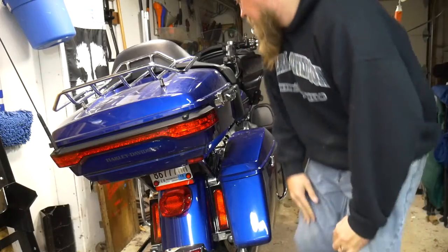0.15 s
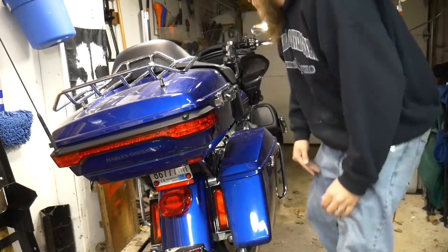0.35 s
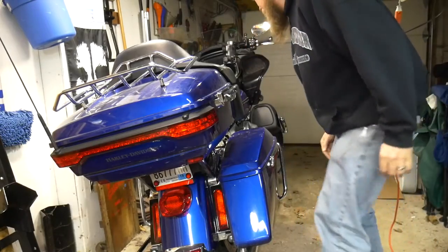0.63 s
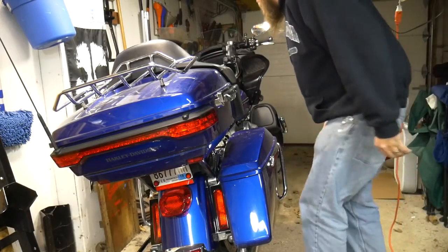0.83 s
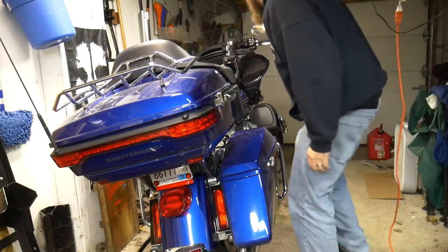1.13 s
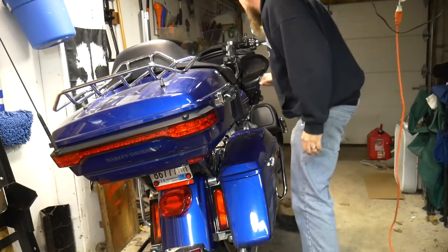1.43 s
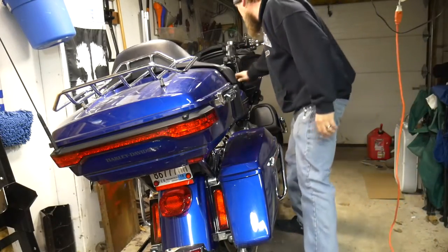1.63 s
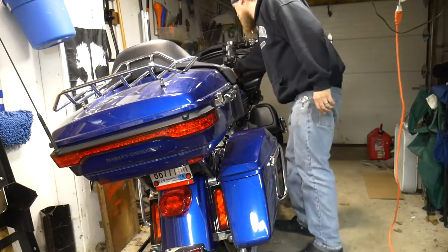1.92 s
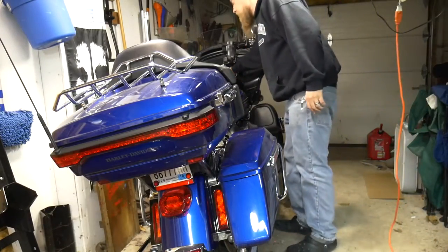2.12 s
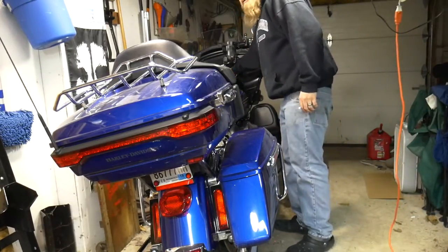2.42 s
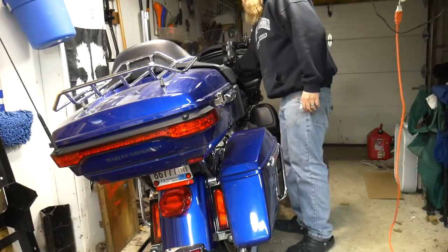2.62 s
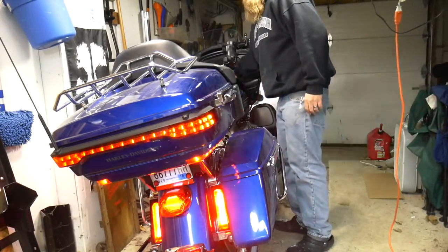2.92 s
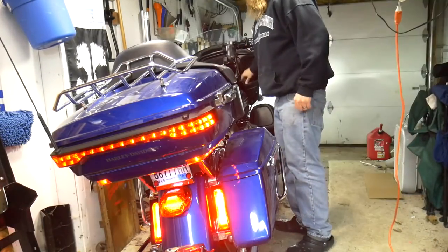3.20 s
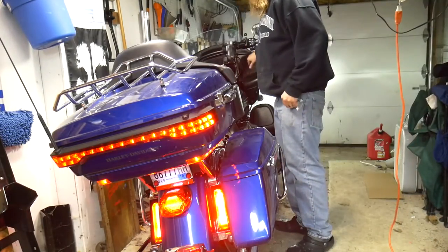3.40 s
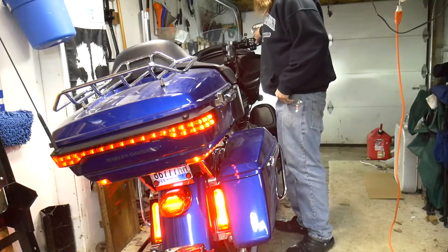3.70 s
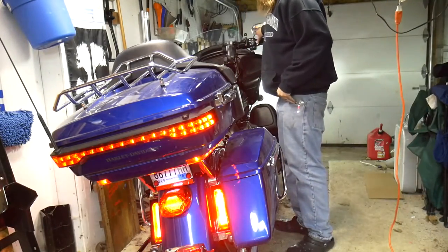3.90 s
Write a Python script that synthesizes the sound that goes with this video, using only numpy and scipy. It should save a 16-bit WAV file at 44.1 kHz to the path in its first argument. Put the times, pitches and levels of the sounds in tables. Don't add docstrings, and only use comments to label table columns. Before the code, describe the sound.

Quiet shuffling over a low hum, a sharp ignition knob snap that rings briefly, a relay clack, then a motorcycle fuel pump whining.

```python
import sys
import numpy as np
from scipy import signal
from scipy.fft import rfft, irfft, next_fast_len
from scipy.io import wavfile
from scipy.ndimage import uniform_filter1d

SR = 44100
rng = np.random.default_rng(int(sys.argv[2]) if len(sys.argv) > 2 else 0)


def digitize_waveform(pressure):
    field = np.atleast_2d(pressure).T
    bounded = np.clip(field, -1, 1)
    quanta = np.round(bounded * 32767).astype(np.int16)
    wavfile.write(sys.argv[1], SR, quanta)


def nominal_scale(level):
    x = np.asarray(level, float) / 20
    return 10 ** x


N = 178635
T = np.arange(N) / SR

# t/s, peak level/dB, rise/ms, time for the rattle to die by 60 dB/ms
KNOB_SNAP = (2.6086, -2, 3.6, 52)


def knob():
    # f/Hz, level/dB
    spectrum = [(150, -60), (250, -39), (400, -13), (800, -18), (1050, -2.5), (1500, -8), (1900, -5.5),
                (2700, -12), (3500, -9), (4600, -14), (5300, -15), (6500, -20.5), (14300, -32.5),
                (16500, -50)]
    # f/Hz, level/dB, time to die by 60 dB/s
    modes = [(1050, 2.5, .03), (1754, -11, 0.037), (2300, -9, .04), (3500, -8, 0.032), (4700, -13, 0.028),
             (6570, -10, 0.033)]
    return snap(KNOB_SNAP, spectrum, modes, ring_db=-1.7, echo_db=-2.4)


def relay():
    # t/s, peak level/dB, rise/ms, time for the rattle to die by 60 dB/ms
    relay_snap = (2.963, -14.5, 4, 55)
    # f/Hz, level/dB
    spectrum = [(150, -50), (300, -4), (795, -7), (1030, -10), (1400, -4.5), (2900, -3.5), (3900, -4),
                (4600, -14), (9000, -30), (13600, -32), (16500, -45)]
    # f/Hz, level/dB, time to die by 60 dB/s
    modes = [(1944, -8.5, 0.062), (2877, 2.5, .04), (3776, -4, 0.04), (4940, -18, .04)]
    return snap(relay_snap, spectrum, modes, ring_db=0.1, echo_db=-0.1)


def snap(hit, spectrum, modes, ring_db, echo_db):
    # f/Hz, level/dB
    small_part = [(200, -40), (550, -13), (850, -0.5), (3000, 2), (9000, 3)]
    s, db, rise_ms, t60_ms = hit
    size = 8192
    t = T[:size]
    fade_in = np.minimum(1000 * t, 1)
    shape = np.minimum(1000 * t / rise_ms, 1) ** 2 * nominal_scale(-60000 * t / t60_ms)

    rattle = colour(rng.standard_normal(size) * shape, spectrum) * fade_in
    rattle = rattle / np.linalg.norm(rattle)

    hits = rng.standard_normal(size) * shape ** 4 * (rng.random(size) < 0.05)
    housing = signal.fftconvolve(hits, rings(modes, t))[:size]
    housing = nominal_scale(ring_db) * housing / np.linalg.norm(housing)

    blow = colour(signal.unit_impulse(size, 300), spectrum)
    blow = blow / np.linalg.norm(blow)

    direct = colour(rattle + housing, small_part) * fade_in * (t < 0.15)
    gain = nominal_scale(db) / abs(direct).max()
    out = np.zeros((2, N))
    add(out[0], s, gain * direct)
    add(out[1], s, gain * nominal_scale(echo_db) * (blow + 0.22 * housing))
    return out


def pump():
    on = np.clip((T - 2.99) / 0.028, 0, 1)
    return on * (np.sqrt(2) * (vane_whine() + whistle()) + motor_case())


# t/s, vane tone f/Hz, vane tone level/dB, pressure/0-1
PUMP_RUN = [
    (3.062, 2415, -53, 0),
    (3.088, 2415, -45, 0),
    (3.262, 2403, -46, 0),
    (3.29, 2371, -50, .45),
    (3.35, 2363, -66, .5),
    (3.42, 2363, -58, .5),
    (3.62, 2361, -52.5, .6),
    (3.85, 2355, -47, .9),
    (4.05, 2350, -46, 1),
]
VANES = 37


def shaft_angle():
    s, hz, _, _ = np.transpose(PUMP_RUN)
    start_s, spin_up_s = 2.944, 0.022
    speed = 1 - np.exp(-np.maximum(T - start_s, 0) / spin_up_s) + 0.0006 * drift(40)
    return 2 * np.pi * np.cumsum(np.interp(T, s, hz) * speed) / SR / VANES


def vane_whine():
    # multiple of shaft speed, level/dB
    uneven = [(36, -68), (38, -61), (75, -78), (110, -69), (147, -69), (149, -72), (184, -80), (186, -75),
              (220, -79), (221, -69), (223, -72)]
    # free level/dB, gain at full pressure/dB, gain per dB the main tone drops/dB, wander/dB
    overtones = [(-66.5, 2, .9, 1.3), (-63, 7, 0, 1.3), (-68, 9, 0, 2.2), (-69, 3, 0, 2.2),
                 (-65.5, 1.5, 0, 2)]
    full_tone_db = -46
    s, _, tone_db, pressure = np.transpose(PUMP_RUN)
    tone_db, pressure = np.interp(T, s, tone_db), np.interp(T, s, pressure)
    drop_db = np.clip(full_tone_db - tone_db, 0, 11)
    turns = shaft_angle()
    whine = nominal_scale(tone_db + 0.9 * drift(60)) * np.sin(VANES * turns)
    for k, (db, load_db, drop_gain, wander_db) in enumerate(overtones, start=2):
        level_db = db + load_db * pressure + drop_gain * drop_db + wander_db * drift(50)
        whine += nominal_scale(level_db) * np.sin(k * VANES * turns)
    for k, db in uneven:
        whine += nominal_scale(db + 2.8 * drift(10)) * np.sin(k * turns + 6 * rng.random())
    return whine


def motor_case():
    # multiple of shaft speed, level/dB
    shaft = [(4, -66), (5, -69), (6, -66), (7, -54.5), (8, -54), (9, -61), (13, -71)]
    # t/s, level/dB
    case_level = [(3.05, -42), (3.09, -56), (3.136, -53.5), (3.222, -48), (3.278, -52), (3.388, -49),
                  (3.726, -50.5), (3.782, -48), (4.05, -50.5)]
    turns = shaft_angle()
    orders = sum(nominal_scale(db + 3 * drift(25)) * np.sin(k * turns + 6 * rng.random()) for k, db in shaft)
    roughness = evened(resonate(rng.standard_normal(N), 407, 260))
    case = evened(orders) + 0.85 * roughness
    trim_db = -0.6
    return nominal_scale(trim_db) * nominal_scale(np.interp(T, *np.transpose(case_level))) * evened(case)


def whistle():
    # f/Hz, level/dB
    tones = [(2011.5, -64.5), (4021, -72), (6035, -64.5), (8043, -76)]
    rise = np.clip((T - 2.95) / 0.25, 0, 1) ** 0.44
    return rise * sum(nominal_scale(db + 1.2 * drift(20)) * np.sin(2 * np.pi * f * T) for f, db in tones)


def frame():
    # f/Hz, level/dB, time to die by 60 dB/s
    modes = [(634, -59, 2.5), (1113, -39, 0.54), (1190, -58, 1.6), (1380, -56, 2.4), (1816, -45.5, 1.05),
             (5300, -37, .25)]
    t = np.maximum(T - KNOB_SNAP[0], 0)
    damping = np.clip((3.02 - T) / 0.06, 0, 1)
    return np.sqrt(2) * rings(modes, t) * damping


def knocks():
    # t/s, peak level/dB, ring f/Hz, width/Hz, contact/ms
    small_knocks = [(.4165, -25, 893, 500, 2.44), (.418, -30.5, 447, 250, 3.8), (.499, -43, 8600, 2480, 1),
                    (.689, -39, 1200, 900, 4.5), (.68, -40, 556, 350, 31), (.706, -49, 6500, 5000, 5),
                    (.885, -51, 1010, 900, 3.3), (.892, -36.5, 3320, 1600, 15),
                    (1.015, -48, 13000, 5000, 16), (1.098, -41, 620, 300, 4.6), (1.452, -41, 820, 250, 14),
                    (1.436, -34, 3640, 4000, 12), (1.643, -34, 1250, 900, 2), (2.122, -53, 1900, 1200, 1.5),
                    (2.202, -45, 2600, 2000, 1.5), (2.262, -39, 1240, 700, 1.6),
                    (2.263, -47, 6000, 6000, 1.1), (2.433, -46.5, 1700, 900, 1.8),
                    (3.815, -44, 801, 199.8, 6), (3.897, -46, 2500, 1500, 3), (3.942, -38, 1310, 600, 1.3),
                    (3.943, -38, 3500, 3000, 1.5)]
    # t/s, peak level/dB, ring f/Hz, width/Hz, contact/ms
    latch = [
        (2.951, -31.5, 1390, 1400, 10),
        (2.951, -40, 7800, 4000, 7.8),
        (2.952, -34, 4670, 500, 11),
        (2.976, -29.5, 783, 200, 8.3),
        (2.978, -37, 7940, 9000, 25),
        (2.996, -21.5, 440, 200, 9),
        (3.022, -31, 445, 160, 20),
    ]
    out, t = np.zeros(N), T[:3000]
    for s, db, hz, width, contact_ms in sorted(small_knocks + latch):
        u = 1000 * t / contact_ms
        puff = resonate(rng.standard_normal(3000) * u * np.exp(-2 * u), hz, width)
        add(out, s, nominal_scale(db) * puff / abs(puff).max())
    return out


def shuffle():
    # f/Hz, level/dB
    sole = [(200, -53), (400, -12), (600, -5.5), (1150, 0), (1700, -5), (2400, -9.5), (3500, -23),
            (7000, -60)]
    cloth = [(600, -52), (1200, -19), (2000, -4.5), (2800, -3), (3400, 0), (4200, -6.5), (6000, -12),
             (9000, -24.5), (15000, -52)]
    grit = [(1500, -50), (3000, -16), (5500, 0.5), (8000, -1), (12000, -4.5), (15000, -8.5), (16500, -24)]
    # peak t/s, level/dB, time to rise 10 dB/s, time to fall 10 dB/s
    scrapes = [(0.0, -56, .05, .03), (.09, -60, .08, .12), (.192, -53, .07, .25), (.366, -54, .25, .08),
               (.5, -51, .15, .12), (.695, -39.5, .085, .042), (.78, -58, .03, .15), (.888, -47, .007, .22),
               (1.11, -47, .03, .02), (1.15, -64, .03, .08), (1.445, -45.5, .013, .11),
               (1.66, -44, .1, .07), (1.9, -66, .2, .3), (2.13, -52.5, .04, .02), (2.2, -55, .015, .06),
               (2.26, -48.5, .007, .012), (2.375, -57, .04, .035), (2.55, -59.5, .1, .1),
               (3.05, -56, .05, .02), (3.2, -57, .1, .2), (3.818, -57, .04, .06), (3.942, -54, .01, .04)]
    # peak t/s, level/dB, time to rise 10 dB/s, time to fall 10 dB/s, grit against cloth level/dB
    rustles = [(0.0, -56, .1, .5, -7), (.2, -54, .08, .3, -12), (.3, -54, .15, .075, -5.5),
               (.53, -55, .17, .1, -10), (.7, -50, .15, .035, -14), (.8, -66, .1, .2, -8),
               (.89, -50.5, .011, .14, -10), (1.02, -62, .07, .035, -3), (1.11, -57, .04, .025, -14),
               (1.17, -67, .05, .11, -9), (1.44, -42, .011, .04, -4.5), (1.59, -52, .09, .13, -12),
               (1.67, -51, .15, .09, -20), (1.755, -55, .07, .03, -12), (1.85, -67, .1, .25, -12),
               (2.06, -66, .025, .1, -15), (2.19, -56, .025, .12, -24), (2.26, -55, .02, .02, -15),
               (2.43, -63, .015, .03, -16), (3.06, -56, .05, .03, -12), (3.2, -59, .08, .12, -6),
               (3.942, -50, .006, .05, -17)]
    cloth_moves = [row[:4] for row in rustles]
    grit_moves = [(s, db + grit_db, rise, fall) for s, db, rise, fall, grit_db in rustles]
    layers = [  # movements, colour, slips a second, spread/dB, trim/dB, fuel level/dB
        (scrapes, sole, 3500, 2.5, 0.6, -60),
        (cloth_moves, cloth, 6000, 2.6, 1.5, -63.5),
        (grit_moves, grit, 9000, 2.6, 6, -66.5)]
    flow = np.clip((T - 2.98) / 0.04, 0, 1)
    out = np.zeros(N)
    for moves, body, slips_per_s, spread_db, trim_db, fuel_db in layers:
        size_db = spread_db * np.minimum(rng.exponential(1, N), 4)
        slips = rng.standard_normal(N) * (rng.random(N) < slips_per_s / SR) * nominal_scale(size_db)
        level = np.sqrt(swells(moves) + (flow * nominal_scale(fuel_db)) ** 2)
        out += level * nominal_scale(trim_db) * evened(colour(slips, body))
    return out


def swells(rows):
    power = np.zeros(N)
    for s, db, rise, fall in rows:
        distance = np.maximum((s - T) / max(rise, 0.003), (T - s) / max(fall, 0.003))
        power += nominal_scale(db - 10 * distance) ** 2
    return power


def appliance():
    # f/Hz, level/dB
    hum = [(46.6, -63.5), (73.4, -70), (93.3, -67), (120, -56), (139.9, -55.5), (166.7, -64),
           (259.6, -61.5)]
    # f/Hz, width/Hz, level/dB
    drone = [(267.4, 54, -61.5), (414, 102, -63)]
    # f/Hz, level/dB
    air = [(100, -38), (170, -11.5), (269, -4.5), (320, -11), (410, -6), (480, -15.5), (700, -20),
           (1000, -18.5), (1600, -24), (2600, -29), (3300, -26.5), (5000, -33.5), (9000, -35.5),
           (16000, -36.5)]
    lines = sum(nominal_scale(db + 0.68 * drift(5)) * np.sin(2 * np.pi * (f * T + rng.random())) for f, db in hum)
    panels = np.zeros(N)
    for f, width, db in drone:
        panels += nominal_scale(db + 1.25 * drift(10)) * evened(resonate(rng.standard_normal(N), f, width))
    rumble = nominal_scale(-58.5) * evened(resonate(rng.standard_normal(N), 102, 123))
    hiss = nominal_scale(-53.5) * evened(colour(rng.standard_normal(N), air))
    return np.sqrt(2) * lines + panels + rumble + hiss


def garage(x):
    # f/Hz, time to die by 60 dB/s
    decay = [(400, 0.36), (1000, 0.32), (2500, .27), (6000, 0.25), (14000, 0.17)]
    taps = np.zeros(SR)
    at = np.arange(96, SR - 20, 24)
    at = at + rng.integers(0, 24, len(at))
    taps[at] = rng.choice([-1., 1.], len(at))
    hz, t, z = signal.stft(taps, SR, nperseg=256)
    fading = nominal_scale(-60 * t / read(decay, hz)[:, None])
    tail = signal.istft(z * fading, SR, nperseg=256)[1]
    return signal.fftconvolve(x, tail / np.linalg.norm(tail))[:N]


def evened(x):
    return x / np.sqrt(np.mean(x ** 2) + 1e-20)


def read(points, hz):
    f, value = np.transpose(points)
    return np.interp(np.log(hz + 1), np.log(f + 1), value)


def colour(x, points):
    size = next_fast_len(len(x))
    gain = nominal_scale(read(points, np.fft.rfftfreq(size, 1 / SR)))
    return irfft(rfft(x, size) * gain, size)[:len(x)]


def resonate(x, hz, width):
    b, a = signal.iirpeak(hz, hz / width, SR)
    return signal.lfilter(b, a, signal.lfilter(b, a, x))


def drift(per_s):
    t = T[::128]
    rates = np.geomspace(per_s / 20, per_s, 16)
    wander = sum(np.sin(2 * np.pi * (f * t + rng.random())) / np.sqrt(f) for f in rates)
    return np.interp(T, t, evened(wander))


def add(mix, s, sound):
    part = mix[round(s * SR):][:len(sound)]
    part += sound[:len(part)]


def rings(modes, t):
    return sum(nominal_scale(db - 60 * t / t60) * np.sin(2 * np.pi * hz * t) for hz, db, t60 in modes)


def scene():
    # f/Hz, level/dB
    side_colour = [(40, -27), (100, -34), (500, -29), (1000, -28), (4000, -24.5), (12000, -17)]
    direct, blows = knob() + relay()
    small = knocks()
    echo = garage(blows + nominal_scale(-7) * small)
    mid = direct + small + echo + shuffle() + frame() + pump() + appliance()
    flutter = uniform_filter1d(rng.standard_normal(N), size=600)
    flutter = evened(uniform_filter1d(flutter, size=600))
    limited = 0.029 * np.tanh(mid / 0.028)
    side = colour(limited * flutter * nominal_scale(3.3 * drift(40)), side_colour)
    return np.array([mid + side, mid - side])


def low_pass(x):
    return signal.sosfilt(signal.butter(12, 16800, fs=SR, output="sos"), x)


def record(dry):
    cut = signal.sosfilt(signal.butter(6, 39, "high", fs=SR, output="sos"), dry)
    cut = signal.sosfilt(signal.cheby2(10, 30, 15950, fs=SR, output="sos"), cut)
    return low_pass(cut)


dry = scene()
out = record(dry)
digitize_waveform(out)
```